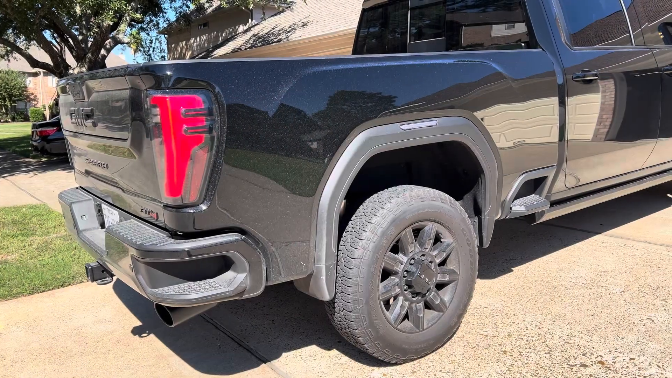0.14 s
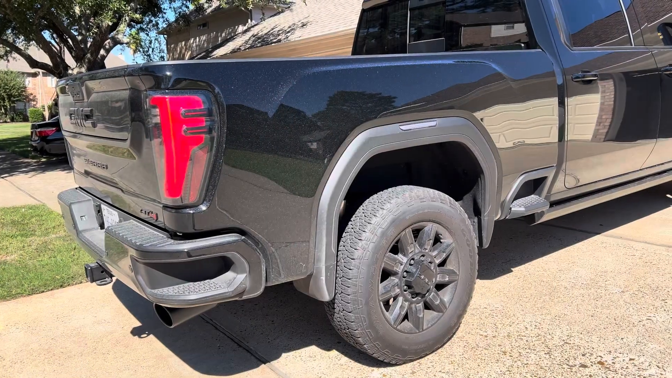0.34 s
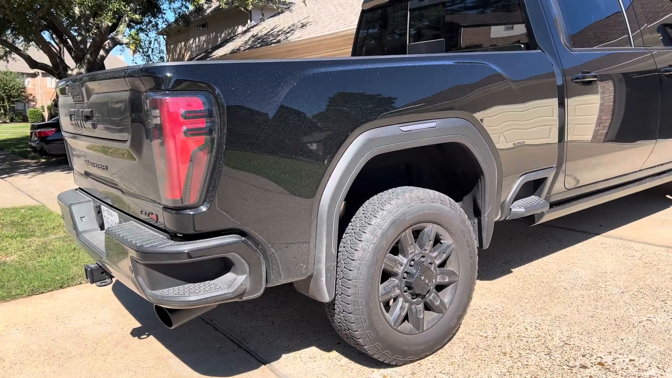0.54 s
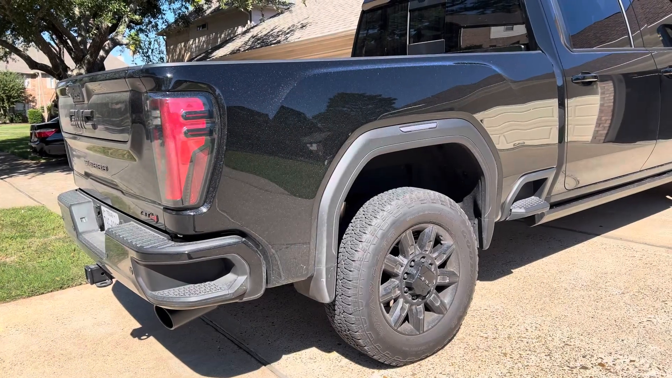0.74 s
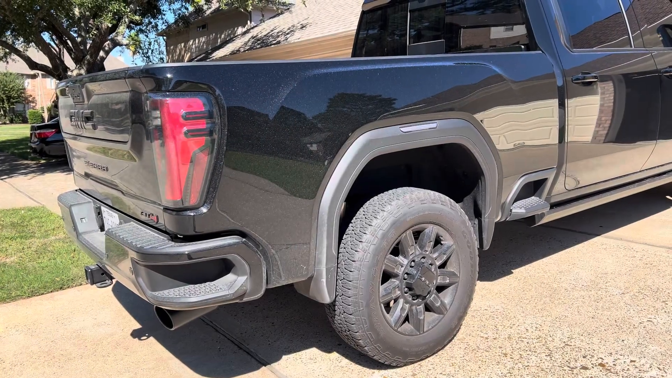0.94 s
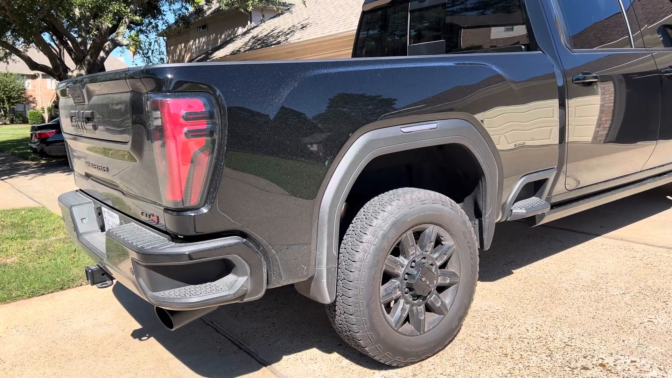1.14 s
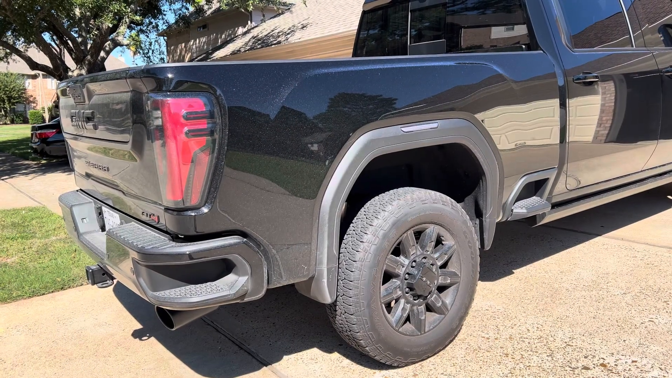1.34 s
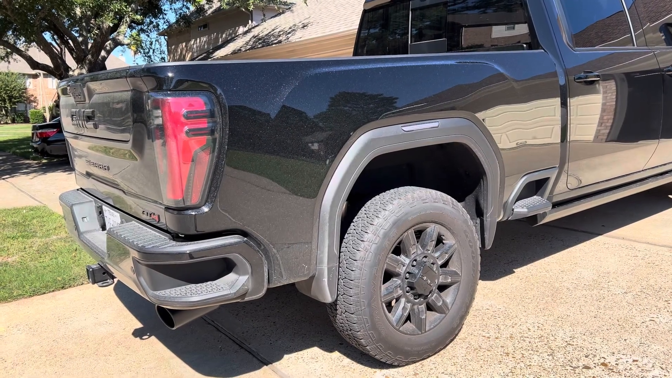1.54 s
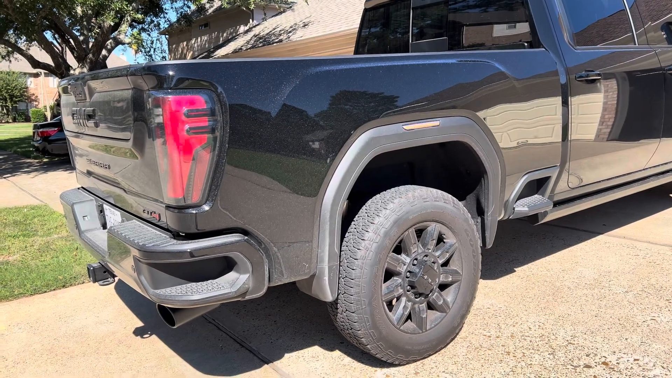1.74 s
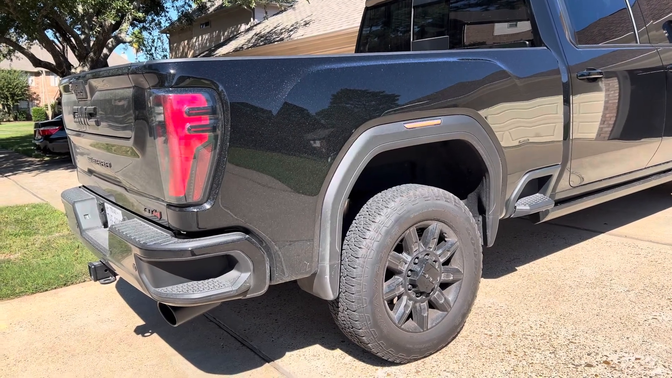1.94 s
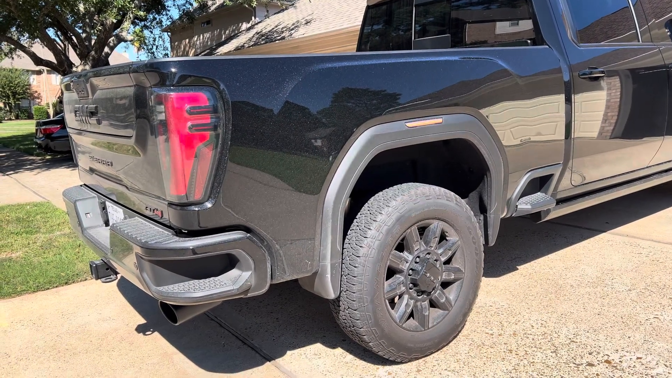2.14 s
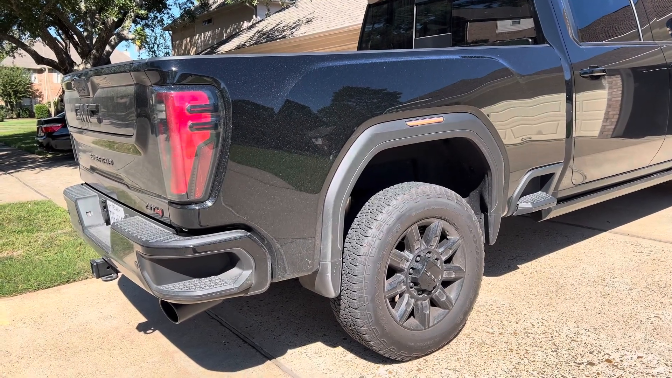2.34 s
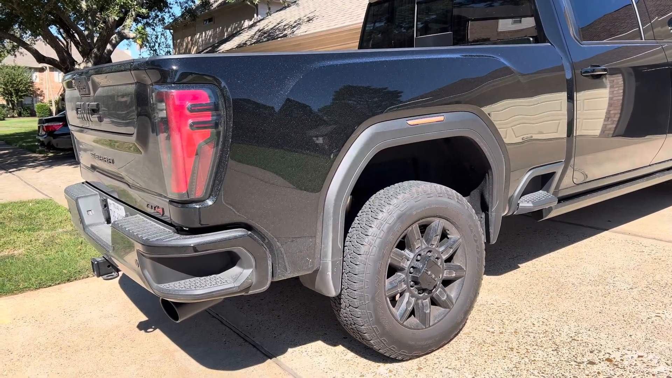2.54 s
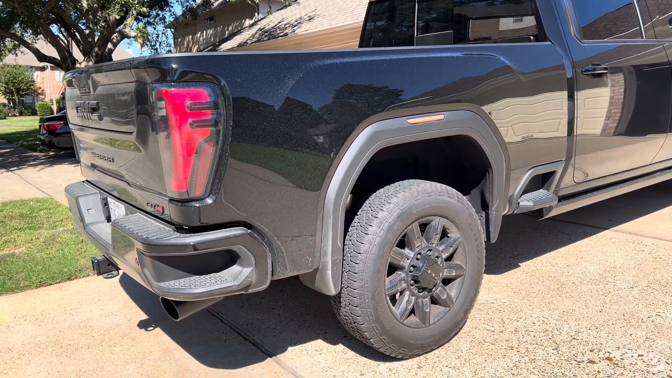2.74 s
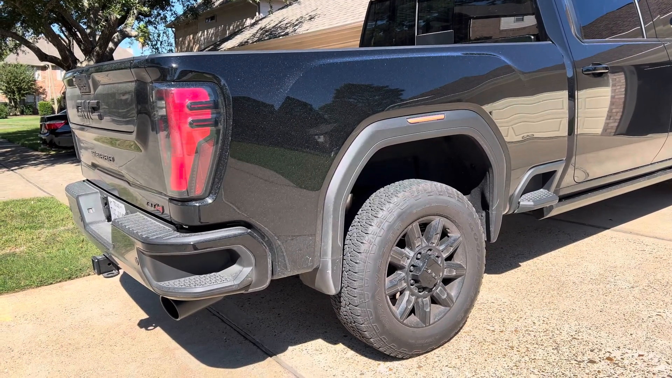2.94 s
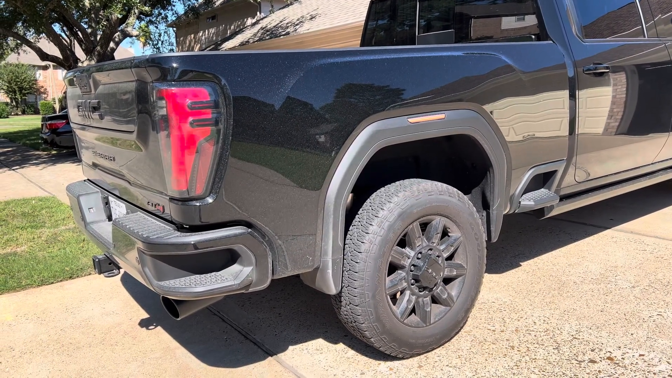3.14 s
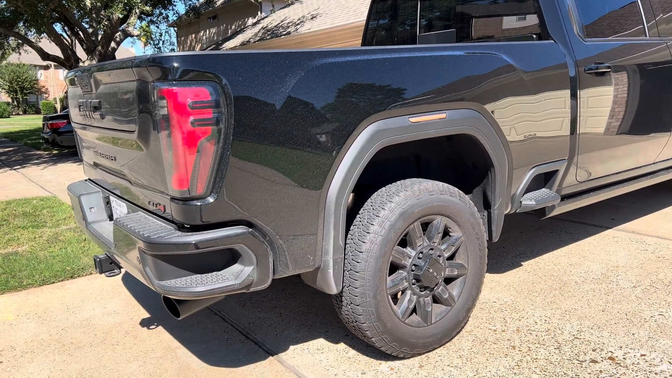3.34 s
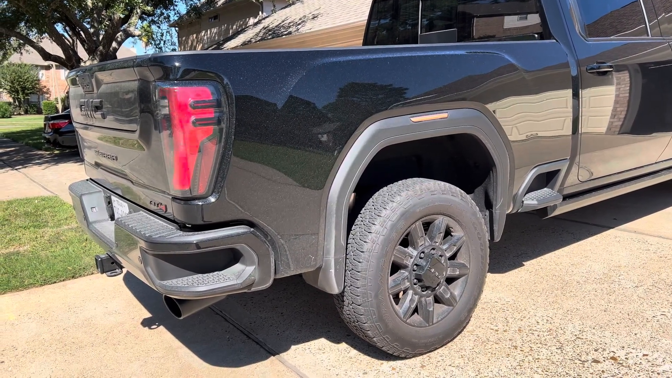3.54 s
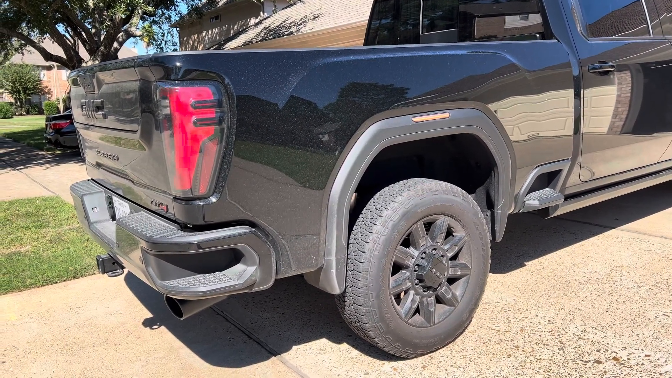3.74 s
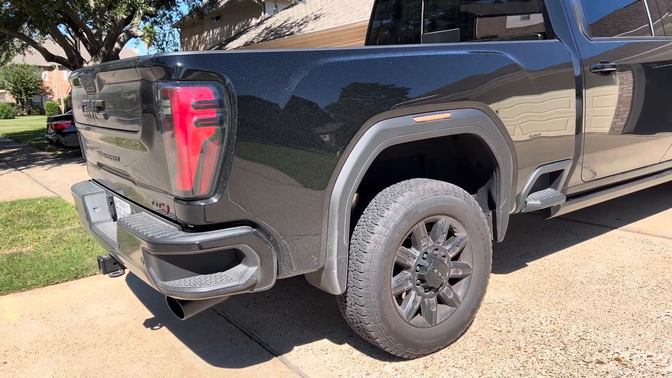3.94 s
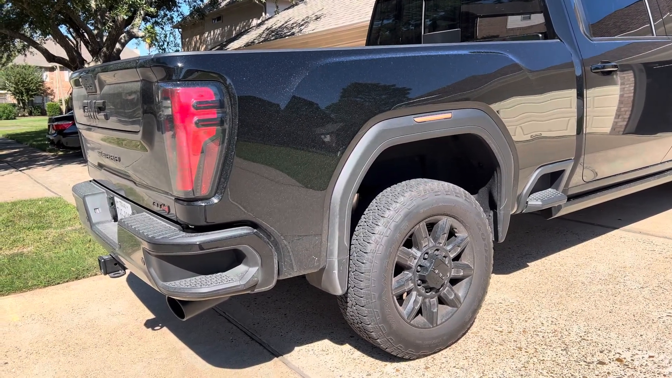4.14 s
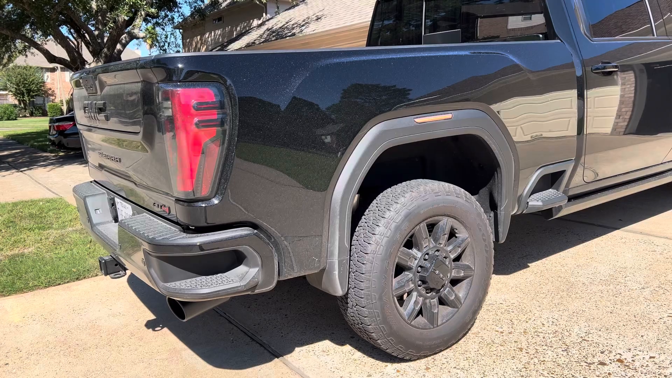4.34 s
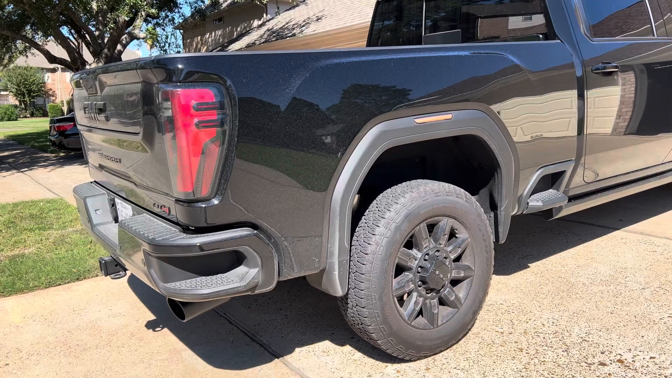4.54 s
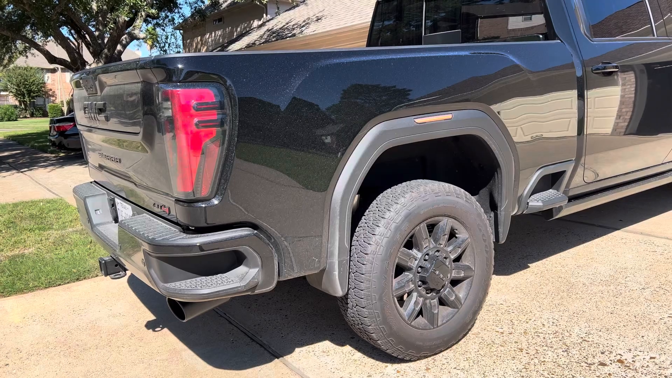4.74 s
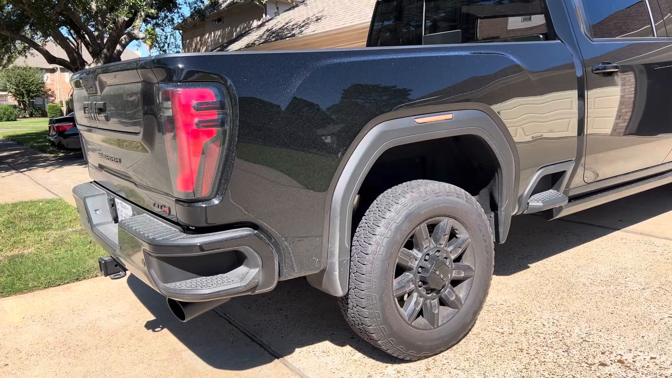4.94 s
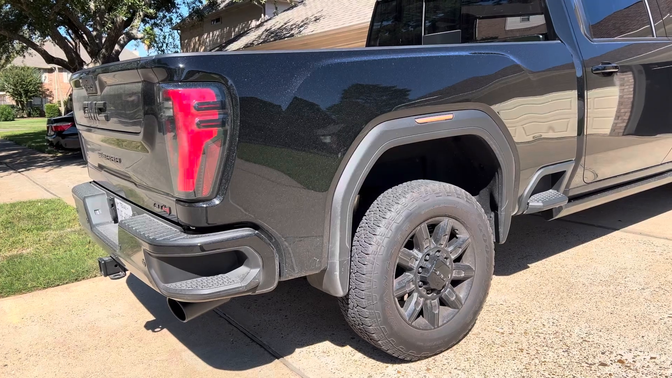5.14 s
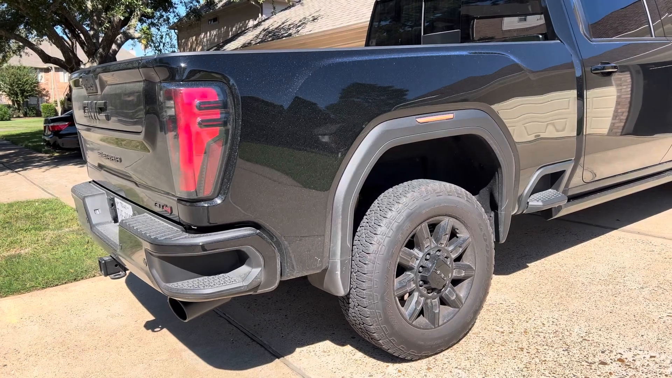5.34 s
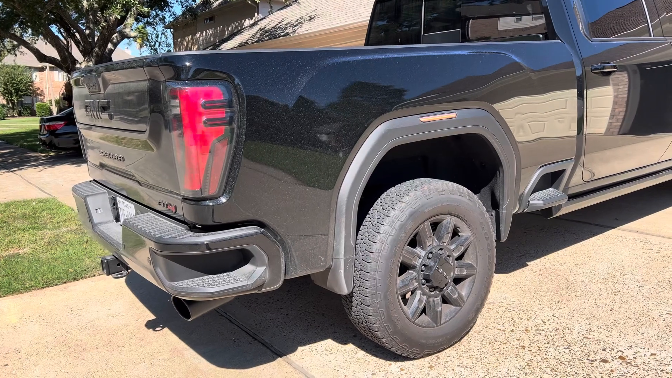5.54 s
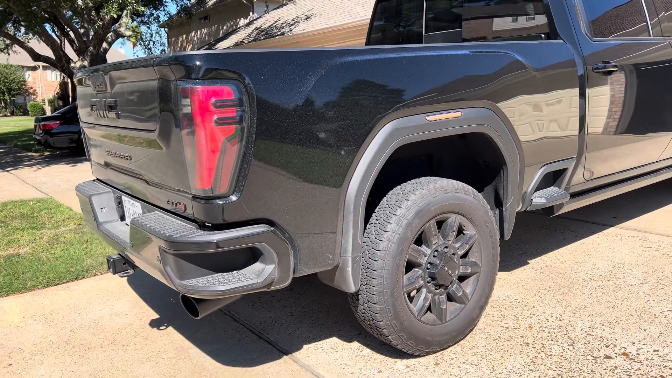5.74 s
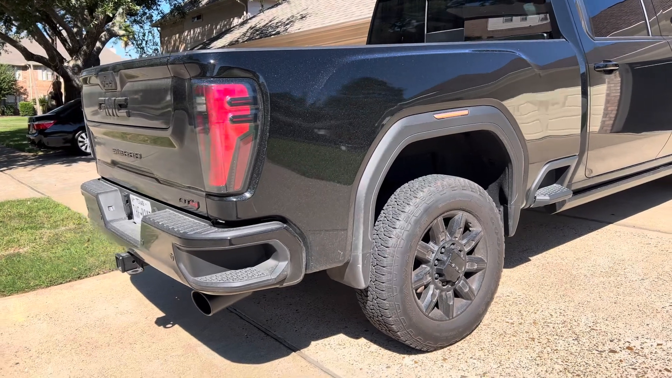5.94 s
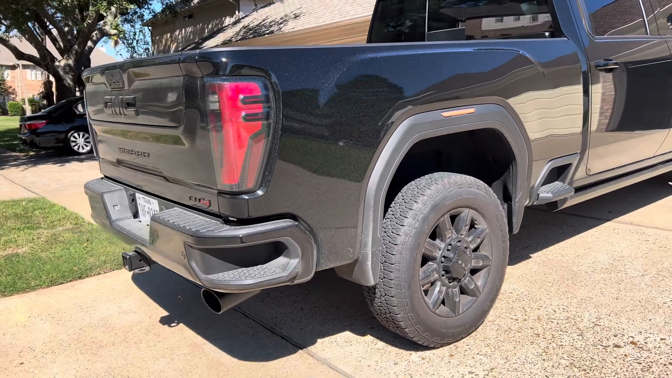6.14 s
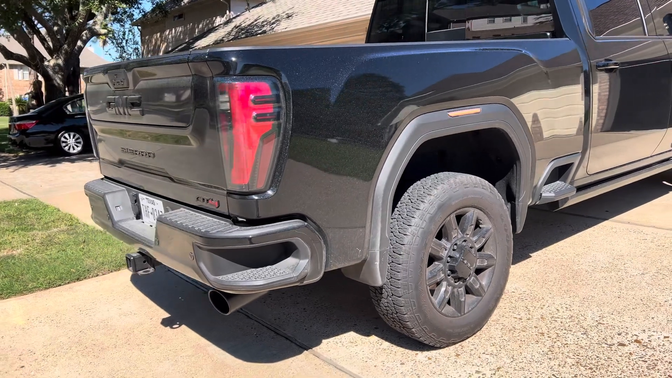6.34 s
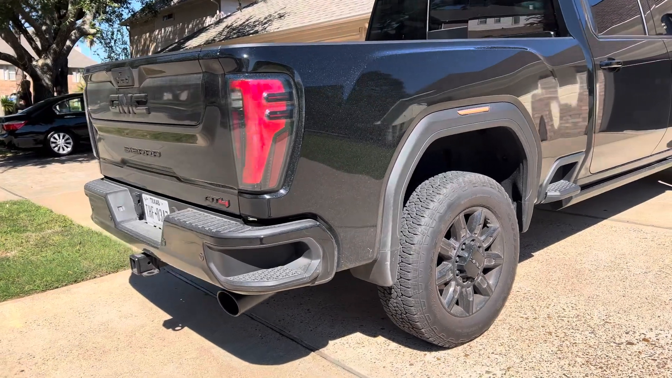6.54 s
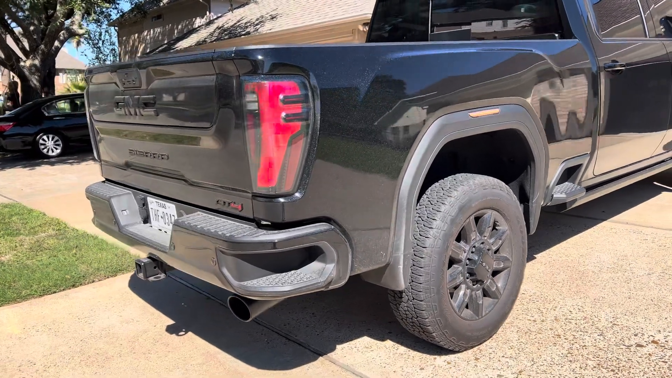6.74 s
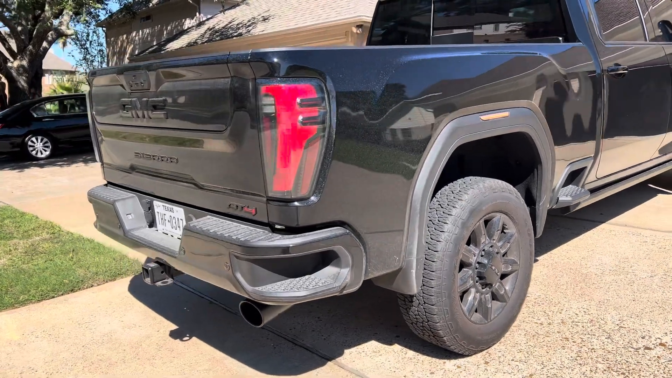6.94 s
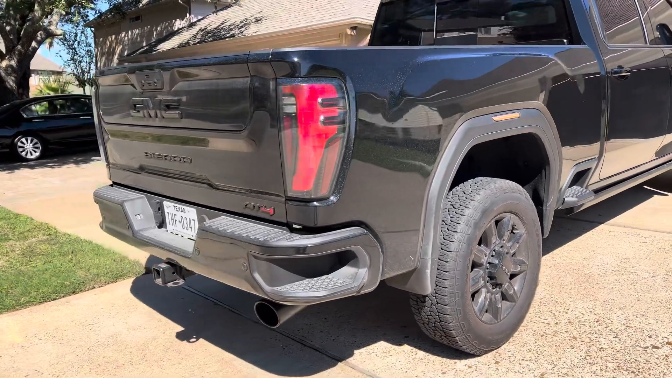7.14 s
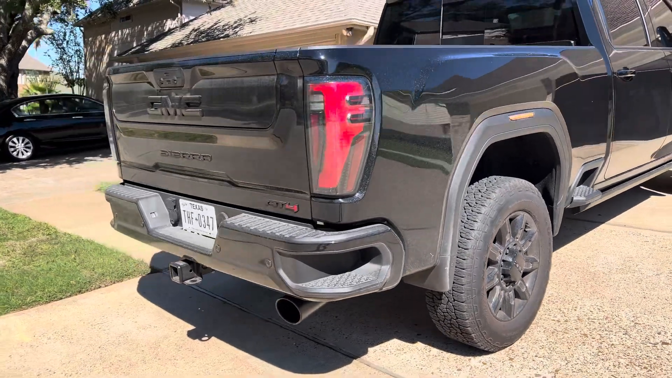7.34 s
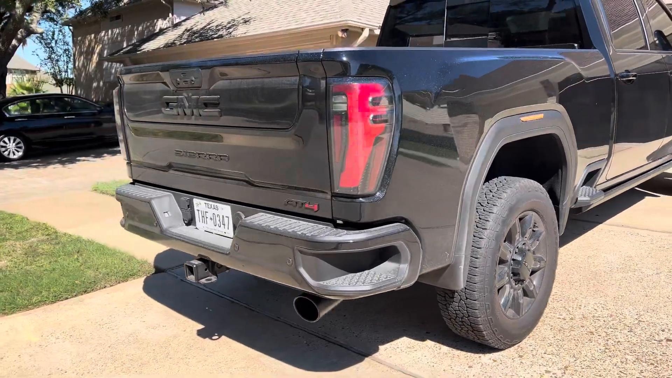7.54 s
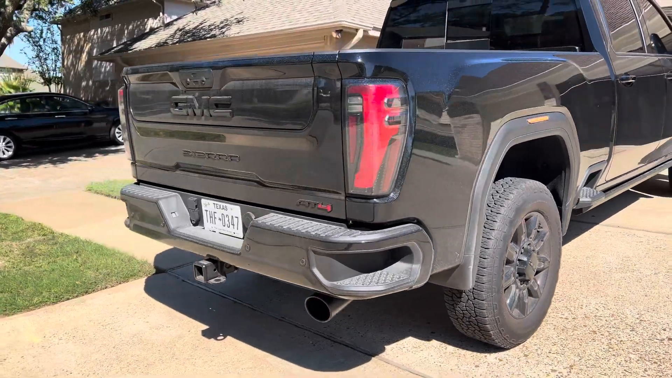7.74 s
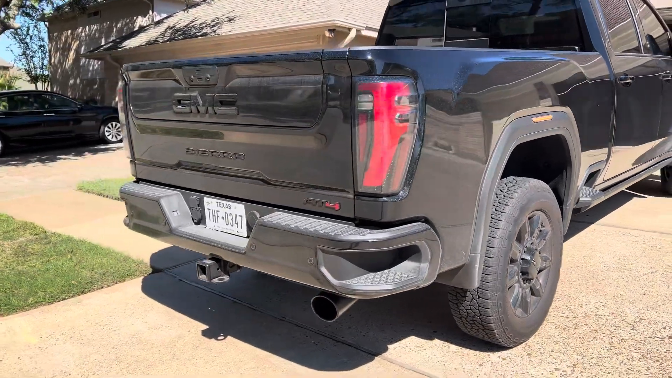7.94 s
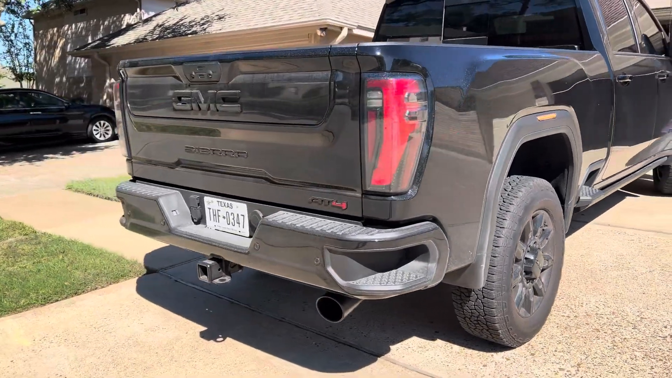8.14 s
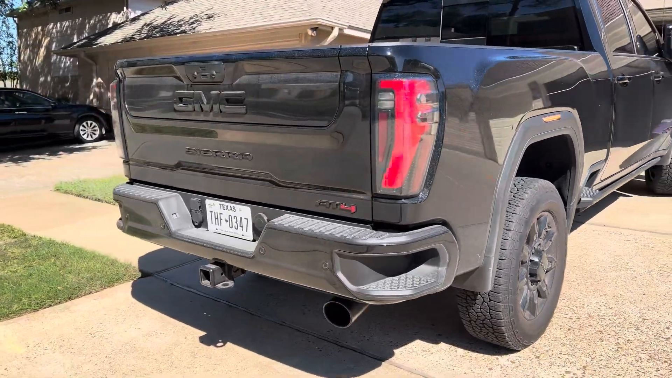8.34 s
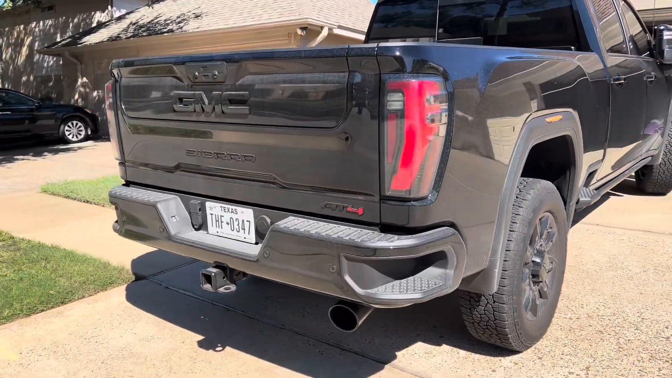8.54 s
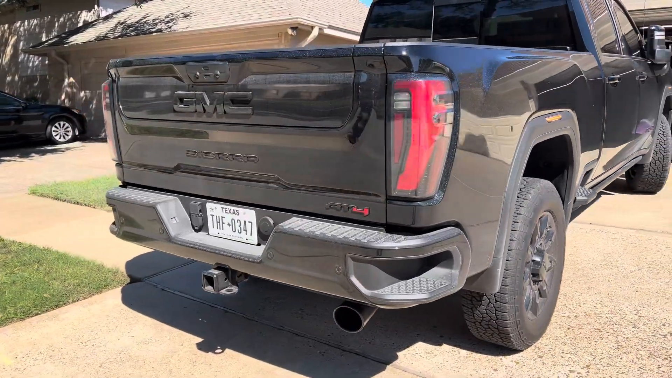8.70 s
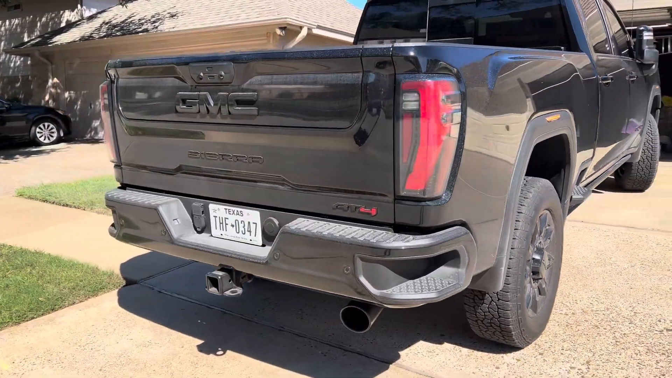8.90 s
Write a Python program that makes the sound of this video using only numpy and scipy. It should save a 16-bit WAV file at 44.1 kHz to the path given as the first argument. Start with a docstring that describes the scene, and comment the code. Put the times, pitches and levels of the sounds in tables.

```python
"""A big petrol V8 pickup is started on a driveway, heard from beside its tailpipe.
First a fuel pump spins up and primes over a low rumble; then the starter clacks in and its gears grind
through a few compressions, with dull puffs from the pipe. The engine catches, stumbles once, cracks and flares,
then sinks to a lumpy idle: a note built from sine waves, with hiss, ticks and a thin whine.
Late on the listener steps round behind the pipe, and the exhaust grows fuller."""
import sys
import numpy as np
from scipy import signal
from scipy.fft import rfft, irfft
from scipy.io import wavfile
from scipy.ndimage import uniform_filter1d

SR = 44100
rng = np.random.default_rng(int(sys.argv[2]) if len(sys.argv) > 2 else 0)


def transcribe(signal):
    """Save signal, clipped to [-1, 1], as a 16-bit WAV file at the path in sys.argv[1]."""
    frames = np.atleast_2d(signal).T
    limited = np.clip(frames, -1, 1)
    pcm = np.round(limited * 32767).astype(np.int16)
    wavfile.write(sys.argv[1], SR, pcm)


N = 395577
TIME, BINS = np.arange(N) / SR, np.fft.rfftfreq(N, 1 / SR)  # seconds, Hz
CATCH_S, FLARE_S = 1.5, 2.0  # the engine catches; the flare reaches its top
IDLE_RATE, FLARE_RATE = 82, 95  # firings per second


# How strong each multiple of the eight-firing cycle is, from the fourth up.
# Each row: relative level in dB in the flare, while sinking, at idle beside the pipe, and behind it.
NOTE_OVERTONES = [(-24, -38, -34.5, -33.5), (-14.0, -7, -7, -7.5), (-29.5, -37, -30, -31.5),
                  (-24, -14.5, -13, -17), (1, 0.0, 0.0, 0.5), (-24.5, -12.5, -12.5, -16.5),
                  (-28, -26, -29.5, -29), (-15.5, -10, -9, -11.5), (-16.5, -21, -19.5, -28),
                  (-13.5, -15.5, -23.5, -23.5), (-25.5, -21.5, -14.5, -21), (-14.5, -19, -36, -22),
                  (-8, -3.5, -5, -9), (-27, -16.5, -20.5, -16), (-16.5, -12.0, -9, -16),
                  (-28, -25, -16, -16.5), (-35, -20, -12.5, -20), (-16, -14, -11, -10.5),
                  (-27.5, -34, -42.5, -38), (-35.0, -24.5, -25.5, -33.5), (-41, -24.5, -22.5, -22.5),
                  (-38, -36.5, -39.5, -44), (-35.0, -27, -34.5, -30.5), (-36, -28, -28.5, -34),
                  (-22, -23, -31, -33.5), (-22, -40.5, -29.5, -26), (-43.5, -33, -29, -24.0),
                  (-40, -24.5, -22, -34), (-43.5, -35.5, -26, -27.5), (-30.5, -40, -32.5, -36),
                  (-29, -38, -32, -38.5), (-37.5, -45.0, -37.5, -49), (-31.5, -40.5, -44, -40.5),
                  (-40, -26, -36.5, -35), (-44, -32.5, -29.5, -35.5), (-49, -45, -33.5, -40.5),
                  (-47, -38, -29.5, -23.5), (-47, -52.5, -39, -28), (-42, -57, -48.5, -37),
                  (-38.5, -54.5, -47.5, -49), (-36.5, -53, -50.5, -37.5), (-46, -39, -48, -48.5),
                  (-43, -35, -44, -40.5)]
# Which of those four columns is heard. Each row: time in seconds, column number (fractions blend).
NOTE_STAGE = [(2.05, 0), (2.35, 1), (3.2, 1), (4.3, 2), (5.9, 2), (7.7, 3)]
# The cylinder bank of each firing in the cycle. Each entry: 0 or 1.
BANK_OF_FIRING = np.array([1, 0, 0, 1, 0, 1, 1, 0])
# How hard each cylinder blows, in firing order; this shapes only the phases of the note.
# Each entry: relative strength in dB.
CYLINDER_BLOWS = [3.3, -4.2, 4.9, -4.8, .5, -1.9, 2.9, -2.9]
# Barks that replace the blows in the upper part of the note, again only in its phases.
# Each row: place in the cycle in firings, relative strength in dB.
UPPER_BARKS = [(.8, -2), (1.8, 1), (2.3, 3), (3.8, -10), (4.3, -3), (5.3, -8), (6.8, -2), (7.3, 4)]
# Standing waves of pipe and muffler, which turn the phases of the note.
# Each row: frequency in Hz, width in Hz.
PIPE_WAVES = [(52.5, 8.4), (71, 37), (182, 10), (215, 69), (302, 33)]
# Loudness of the note: dB at idle, dB added at full effort, dB added by the whole walk.
NOTE_LOUDNESS = (-16, 8.6, 5.66)
BARK_FROM = 22  # first multiple of the cycle that uses the barks
VALVE_AT, BANK_DELAY = -.21, .5  # first blow, and extra delay of the longer bank (firings)
PORT_LAG = 7  # the exhaust reaches the left side this much later (samples)


def exhaust(firings, uneven=0.05, jitter=0.005, stumble=1.5):
    """Eight blows a cycle; one bank's pipe is longer, so the uneven bank order makes the note lope."""
    unrest = 1 + stumble * np.interp(TIME, [1.6, 1.76], [1, 0])  # the first firings are ragged
    cycle = (firings + jitter * unrest * drift(45)) / 8
    arrivals = VALVE_AT + np.arange(8) + BANK_DELAY * BANK_OF_FIRING
    speed, speeds = curves(FIRING_RATE)[0], np.arange(60, 100)
    stage, out = curves(NOTE_STAGE)[0], np.zeros(N)
    for k, row_db in enumerate(NOTE_OVERTONES, 4):
        hz = k * speeds / 8
        pipe = np.prod([1 / (f * f - hz * hz + 1j * hz * width) for f, width in PIPE_WAVES], axis=0)
        at, blow_db = (arrivals, CYLINDER_BLOWS) if k < BARK_FROM else np.transpose(UPPER_BARKS)
        blows = amp(blow_db) @ np.exp(-2j * np.pi * k * at / 8)
        phase = np.interp(speed, speeds, np.unwrap(np.angle(blows * pipe)))
        size = np.interp(stage, np.arange(len(row_db)), amp(row_db))
        out += size * np.cos(2 * np.pi * k * cycle + phase)
    # even out the loudness, so that the level law below sets it
    running = TIME > CATCH_S
    power = uniform_filter1d(out ** 2 * running, size=17000).clip(1e-9)
    share = uniform_filter1d(1. * running, size=17000).clip(1e-9)
    out /= np.sqrt(power / share)
    out *= level(NOTE_LOUDNESS, bend=0.84) * (1 + uneven * unrest * drift(25))
    left = np.concatenate([np.zeros(shape=PORT_LAG), out])[:N]  # the left is farther from the pipe
    return np.array([left, out]) * amp([[-.45], [.45]])


# Tone colour of the chuffs beside the pipe. Each row: frequency in Hz, relative level in dB per Hz.
CHUFF_BESIDE_COLOUR = [(380, -27.5), (490, 8), (590, -3.5), (640, -5), (690, -2), (820, 0.5), (930, -27),
                       (2000, -45.5)]
# The same behind the pipe. Each row: frequency in Hz, relative level in dB per Hz.
CHUFF_BEHIND_COLOUR = [(380, -18.5), (495, 17), (580, 0), (650, -6), (740, -1.5), (830, -11), (930, -22),
                       (2000, -39)]
# Loudness of the chuffs: dB at idle, dB added at full effort, dB added by the whole walk.
CHUFF_LOUDNESS = (-61, 16, 16)


def chuffs(strength, age):
    """The steep front of each blow has a fixed shape, so it makes clean overtones above the note."""
    front = strength * age * np.exp(-(age / .015) ** 2)
    drive = np.array([front, 0 * front])
    beside, rear = (ports(drive, amp(read(colour)), (450, 950))
                    for colour in (CHUFF_BESIDE_COLOUR, CHUFF_BEHIND_COLOUR))
    late = behind()
    return level(CHUFF_LOUDNESS, bend=2.0) * ((1 - late) * beside + late * rear)


# Tone colour of the rushing gas. Each row: frequency in Hz, relative level in dB per Hz.
PUFF_COLOUR = [(30, -10.5), (70, 5.5), (200, 8), (330, 3), (430, -3.5), (520, -9.5), (650, -14.5),
               (820, -8), (950, -34), (1400, -27.5), (3000, -49)]
# Loudness of the gas: dB at idle, dB added at full effort, dB added by the whole walk.
PUFF_LOUDNESS = (-57, 19.8, 4)
# the tailpipe's evenly spaced overtones colour the gas
OVERTONE_HZ, OVERTONE_STEP_HZ = 495, 94


def puffs(strength, age, between=1.0, overtone_db=3.5):
    """A short tear of rushing gas, made of noise, comes with each blow."""
    tear = between * (1 - .5 * effort()) + strength * np.exp(-(age / .27) ** 2)
    overtones = overtone_db * np.cos(2 * np.pi * (BINS - OVERTONE_HZ) / OVERTONE_STEP_HZ)
    gas = ports(tear * rng.standard_normal((2, N)), amp(read(PUFF_COLOUR) + overtones), (550, 950))
    return level(PUFF_LOUDNESS, bend=1.29) * gas


# Strength of each cylinder's chuff and puff, in firing order. Each entry: relative strength in dB.
CHUFF_STRENGTHS = [1, -4, 0, 4.5, -1.5, 1, -4.5, 0]


def blow_timing(firings, early=.15, chance_db=1.5, bank_lag=0.059):
    """Strength of each blow and firings since its front; under load, blows are earlier and more even."""
    load, blow = effort(), firings.astype(int)
    cylinder = blow % len(BANK_OF_FIRING)
    chance = chance_db * (1.5 - load) * rng.standard_normal(blow.max() + 1)[blow]
    strength = amp(np.array(CHUFF_STRENGTHS)[cylinder] + chance)
    return strength, firings % 1 - .47 - bank_lag * BANK_OF_FIRING[cylinder] + early * load


# Hard firings that crack out of the pipe, loudest during the flare.
# Each row: start in seconds, level in dB.
CRACK_TIMES = [(1.577, -41), (1.638, -29), (1.674, -28), (1.703, -23), (1.725, -31), (1.759, -25),
               (1.791, -25), (1.812, -28), (1.849, -26), (1.899, -35), (1.932, -33), (1.985, -31),
               (2.015, -25), (2.076, -31), (2.106, -36), (7.982, -42), (8.475, -39), (8.575, -38.5),
               (8.872, -36)]


def cracks(low_hz=560, high_hz=880, snap=0.11):
    """A hard firing leaves the pipe as one steep front that rings briefly in the tip."""
    fronts = np.zeros(N)
    for s, db in CRACK_TIMES:
        fronts[round(s * SR)] = amp(db)
    click = signal.unit_impulse(shape=1024)
    ring = signal.lfilter(*signal.butter(3, [low_hz, high_hz], "band", fs=SR), click)
    edge = signal.lfilter(*signal.butter(2, [low_hz, 2500], "band", fs=SR), click)
    shape = ring / abs(ring).max() + snap * edge / abs(edge).max()
    return signal.oaconvolve(fronts, shape)[:N]


# Tone colour of the engine bay from beside. Each row: frequency in Hz, relative level in dB per Hz.
BAY_BESIDE_COLOUR = [(400, -10), (950, -3.5), (1450, -3), (1680, -3.5), (1900, -5.5), (2350, -4),
                     (2650, 1.5), (4100, -6), (5150, -5.5), (5500, -5.5), (7500, -14), (11000, -15),
                     (13400, -19), (15800, -18)]
# The same from behind. Each row: frequency in Hz, relative level in dB per Hz.
BAY_BEHIND_COLOUR = [(400, -7), (950, 1.5), (1600, -3), (2400, 1), (2700, 3.5), (3500, -1.5), (4100, -3),
                     (4800, 0), (5100, 0.5), (5450, -4), (7600, -12.5), (8500, -11), (11000, -12),
                     (15800, -24)]
# Resonances of engine bay and underbody heard beside the truck.
# Each row: frequency in Hz, half-width in Hz, relative level in dB.
BAY_BESIDE_MODES = [(1134, 9.1, -2.5), (1290, 6.6, -8), (1380, 17, -3.5), (1500, 23, 3), (1830, 35, -7.5),
                    (2047, 45, -3), (2390, 5.8, 2), (3250, 9.3, -11), (3430, 6.3, -1), (3800, 46, -10),
                    (4800, 47, -3)]
# Those heard behind it. Each row: frequency in Hz, half-width in Hz, relative level in dB.
BAY_BEHIND_MODES = [(1075, 33, -2), (1410, 20, -7), (1580, 53, -3.5), (1630, 31, 0.5), (1760, 25, -1),
                    (2210, 25, -6)]
# Loudness of the bay: dB at idle, dB added at full effort, dB added by the whole walk.
BAY_LOUDNESS = (-55, 8.35, -2.8)


def engine_bay(firings, tick=0.34, flutter_db=0.8, ring_db=5.0):
    """Fan and belt hiss is noise and tiny impacts; injector ticks lift it briefly at each firing."""
    ticks = 1 + tick * np.exp(-(firings % 1) / 0.063)
    hiss = rng.standard_normal((2, N)) + .5 * grains(1500, 1.7)
    drive = ticks * amp(flutter_db * drift(33)) * hiss
    late = behind()
    places = ((BAY_BESIDE_COLOUR, BAY_BESIDE_MODES), (BAY_BEHIND_COLOUR, BAY_BEHIND_MODES))
    beside, rear = (ports(drive, amp(read(colour)) * (1 + amp(ring_db) * peaks(modes)), (2400, 7000))
                    for colour, modes in places)
    spin_up = np.interp(TIME, [1.56, 1.69], [0, 1])
    return spin_up * level(BAY_LOUDNESS, bend=1.45) * ((1 - late) * beside + late * rear)


# Loudness of a thin whine, probably the alternator. Each row: time in seconds, level in dB.
WHINE_LOUDNESS = [(2.7, -80), (3.2, -61), (3.7, -67), (4.0, -68), (4.25, -60), (4.9, -61), (5.15, -68),
                  (5.55, -62), (6.3, -66), (6.75, -58), (7.3, -59), (7.7, -66), (8.3, -62), (8.97, -66)]
WHINE_PER_FIRING = 62.25  # whine cycles per firing


def belt_whine(waver_hz=13, flutter_db=3.5):
    """A thin whine that follows the engine speed, wavering and breaking up."""
    waver = waver_hz * (drift(9) + 2 * drift(150))
    turns = np.cumsum(WHINE_PER_FIRING * curves(FIRING_RATE)[0] + waver) / SR
    flutter = amp(flutter_db * drift(12).clip(-3, 1.3))
    whine = evened(flutter * np.sin(2 * np.pi * turns))
    return amp(curves(WHINE_LOUDNESS)[0]) * (TIME > FLARE_S) * whine


# Engine speed: the flare, then the sinking idle. Each row: time in seconds, firings per second.
FIRING_RATE = [(1.5, 64.61), (1.68, 91.51), (1.85, 93.54), (2.0, 95.06), (2.25, 89.33), (2.55, 88.15),
               (2.8, 86.94), (3.25, 85.98), (3.68, 83.52), (3.85, 84.05), (4.3, 84.01), (4.42, 83.45),
               (4.58, 83.4), (5.15, 82.11), (5.6, 82.73), (6.5, 82.22), (6.88, 81.28), (7.05, 82.26),
               (7.35, 82.49), (7.6, 82.08), (8.1, 81.36), (8.97, 80.36)]


def crank():
    """Firings counted since the engine caught."""
    return np.cumsum(curves(FIRING_RATE)[0] * (TIME >= CATCH_S)) / SR


def effort():
    """How hard the engine works: 1 until the top of the flare, then falling with the speed to 0 at idle."""
    sinking = (curves(FIRING_RATE)[0] - IDLE_RATE) / (FLARE_RATE - IDLE_RATE)
    return np.where(TIME < FLARE_S, 1, np.clip(sinking, 0, 1))


WALK_S = (5.47, 10.8)  # loudness changes along the walk, which outlasts the scene


def level(law, bend):
    """Gain of a layer of the running engine, from the effort and the listener's walk."""
    idle_db, effort_db, walk_db = law
    return amp(idle_db + effort_db * effort() ** bend + walk_db * np.interp(TIME, WALK_S, [0, 1]))


def behind():
    """Blend of tone: 0 beside the truck, 1 behind the tailpipe."""
    return np.interp(TIME, [5.9, 7.7], [0, 1])


# Tone colour of the gears. Each row: frequency in Hz, relative level in dB per Hz.
GEAR_COLOUR = [(25, -19), (45, -2), (90, -1.5), (160, -5), (260, -2.5), (340, -2.5), (600, -10), (1000, -7),
               (1700, -7), (2330, -4.5), (2700, -1), (4800, -7.5), (7500, -11.5), (8300, -12),
               (9700, -27.5), (11000, -11), (13000, -24.5), (15800, -18)]
# Ringing of the starter and bell housing.
# Each row: frequency in Hz, half-width in Hz, relative level in dB.
HOUSING_MODES = [(269, 30, -17.5), (637, 18, 1), (791, 16, 9.5), (1150, 24, 3.5), (1364, 20, 4.5),
                 (1453, 27, 10.5), (1990, 42, 3), (3800, 81, -31), (4400, 22, -3), (4720, 22, 5),
                 (4880, 70, -9)]
# Groans and squeals of the gear teeth under load.
# Each row: start in seconds, length in seconds, first Hz, last Hz, relative level in dB.
GEAR_SQUEALS = [(0.662, 0.037, 389, 363, -36.5), (0.663, 0.051, 1496, 1400, -35),
                (0.716, 0.027, 2050, 1960, -29.5), (0.733, 0.022, 4470, 4170, -43),
                (0.79, 0.13, 1190, 1258, -36.5), (0.846, 0.094, 247, 278, -51),
                (0.886, 0.028, 2020, 1910, -29.5), (0.89, 0.079, 490, 460, -41),
                (0.907, 0.049, 1980, 2050, -34.5), (0.908, 0.025, 4850, 4770, -36),
                (0.956, 0.04, 3950, 4300, -38), (0.993, 0.12, 347, 305, -45),
                (1.014, 0.025, 4200, 4120, -36), (1.03, 0.054, 1290, 1214, -35),
                (1.045, 0.055, 3920, 4240, -35), (1.124, 0.05, 762, 800, -38.5),
                (1.14, 0.097, 1410, 1494, -41), (1.177, 0.06, 4400, 5240, -41),
                (1.224, 0.03, 1358, 1410, -40), (1.314, 0.065, 1367, 1338, -37),
                (1.332, 0.082, 440, 430, -38.5), (1.413, 0.039, 2060, 1950, -32.5)]
# The motor gathers speed: first and top pitch of the gear mesh before any load slows it.
STARTER_ON_S, SPIN_UP_S, MESH_FIRST_HZ, MESH_TOP_HZ = 0.59, .22, 950, 1826


def starter(ring_db=8.0, body_db=6.0, squeal_db=-3.0, whine_db=-11.5, sag=0.2, slip_db=-5.5):
    """Gear teeth clatter and whine in the housing, hardest as each piston comes up on compression."""
    housing = amp(read(GEAR_COLOUR)) * (amp(body_db) + amp(ring_db) * peaks(HOUSING_MODES))
    body, bright = gear_load()
    age = np.maximum(TIME - STARTER_ON_S, 0)
    free_hz = MESH_TOP_HZ + (MESH_FIRST_HZ - MESH_TOP_HZ) * np.exp(-age / SPIN_UP_S)
    # the motor slows under each load and races between them
    slowing = uniform_filter1d(body / body.max(), size=1500)
    mesh_hz = free_hz * (1 - sag * slowing) * (1 + 0.074 * drift(260))
    mesh = 2 * np.pi * np.cumsum(mesh_hz) / SR
    teeth = sum(size * drift(70) * np.sin(k * mesh) for k, size in enumerate([.4, .4, 1, .4], 1))
    clatter = ports(grains(6000, 2.8), housing, (50, 16000))
    gears = clatter + amp(whine_db) * teeth + amp(slip_db) * rings()
    # split near 2800 Hz, as the load drives the treble separately
    treble = irfft(rfft(gears) / (1 + (2800 / (BINS + 1)) ** 4), N)
    sound = body * (gears - treble) + bright * treble
    waver = 25 * drift(175)
    for s, length, first_hz, last_hz, db in GEAR_SQUEALS:
        u = np.clip((TIME - s) / length, 0, 1)
        turns = np.cumsum(first_hz + (last_hz - first_hz) * u + waver) / SR
        side_phase = np.array([[0], [-1.2]]) * (first_hz > 1000)
        squeal = np.sin(np.pi * u) * np.sin(2 * np.pi * turns + side_phase)
        sound = sound + amp(db + squeal_db) * 2 * squeal
    return sound


# The pinion touches, then clacks into the ring gear. Each row: start in seconds, level in dB.
PINION_CLACKS = [(0.641, -41.5), (0.655, -22.5), (0.674, -21.5)]
# Compressions that load the starter.
# Each row: start in seconds, length in seconds, level in dB before it eases.
COMPRESSION_LOADS = [(0.684, 0.34, -32.5), (0.802, 0.23, -34.5), (0.992, 0.125, -30), (1.119, 0.11, -29.5),
                     (1.23, 0.084, -28.5), (1.315, 0.088, -28), (1.407, 0.12, -29)]
CLACK_RISE_S, CLACK_DECAY_S = 0.005, 0.015
# each load bites at once and eases as the piston goes over the top
LOAD_RISE_S, LOAD_EASE_DB, LOAD_TREBLE_DB = 0.0097, -13, -3.5
# the engine runs away from the pinion, which rattles on freely
OVERRUN_S, OVERRUN_END_S, OVERRUN_FADE_S = 1.49, 1.647, 0.02
OVERRUN_DB, OVERRUN_TREBLE_DB = -38, 3


def gear_load(clack_treble_db=0.0):
    """Force on the gears, as gains of body and of treble: clacks, compressions, then the overrun."""
    clacks = strokes = np.zeros(N)
    for s, db in PINION_CLACKS:
        age = np.maximum(TIME - s, 0)
        clack = amp(db) * np.minimum(age / CLACK_RISE_S, 1) * np.exp(-age / CLACK_DECAY_S)
        clacks = np.hypot(clacks, clack)
    for s, length, db in COMPRESSION_LOADS:
        age = np.maximum(TIME - s, 0)
        easing = amp(db + LOAD_EASE_DB * (age / length) ** 2.3)
        strokes = np.hypot(strokes, np.minimum(age / LOAD_RISE_S, 1) * easing)
    fade_in = np.clip((TIME - OVERRUN_S) / OVERRUN_FADE_S, 0, 1)
    fade_out = np.exp(-np.maximum(TIME - OVERRUN_END_S, 0) / OVERRUN_FADE_S)
    parts = np.array([clacks, strokes, amp(OVERRUN_DB) * fade_in * fade_out])
    treble = amp([[clack_treble_db], [LOAD_TREBLE_DB], [OVERRUN_TREBLE_DB]])
    return np.linalg.norm(parts, axis=0), np.linalg.norm(parts * treble, axis=0)


# Brief rings of the ring gear and its cover. Each row: frequency in Hz, relative level in dB.
GEAR_RINGS = [(280, 4), (440, 1.5), (790, -4), (1280, 2.5), (3500, 2.5), (4150, 8), (4750, 6), (5300, 3.5),
              (6000, 5), (8300, -2)]
RINGS_PER_S, RING_S = 450, .014  # how many, and their middling length


def rings(scatter=0.0588, glide=0.034, spread_db=0.5):
    """Teeth catch and slip: each slip is a chirp near one of the rings, with its own length and bend."""
    start = PINION_CLACKS[0][0]
    out, span = np.zeros(N), OVERRUN_END_S + .1 - start
    for when, which, *draws in rng.random((round(RINGS_PER_S * span), 6)):
        pitch, bend, size, long = 3.5 * (np.array(draws) - .5)
        hz, db = GEAR_RINGS[int(which * len(GEAR_RINGS))]
        u = np.linspace(0, 1, round(RING_S * 2 ** (long / 2) * SR))
        turns = np.cumsum(hz * (1 + scatter * pitch + glide * bend * (u - .5))) / SR
        at = round((start + when * span) * SR)
        chirp = np.sin(np.pi * np.sqrt(u)) * np.sin(2 * np.pi * turns)
        out[at:at + len(u)] += amp(db + spread_db * size) * chirp
    return evened(out) * np.sqrt(span * SR / N)  # rms 1 within the span


# Dull puffs from the pipe before the engine fires. Each row: middle in seconds, level in dB.
CRANKING_THUDS = [(.71, -44), (.87, -33), (1.025, -36), (1.15, -51), (1.488, -39)]


def thuds(hz=66, length_s=0.026):
    """During cranking, unburnt charge is pushed softly out of the pipe: short swells of a low tone."""
    return sum(amp(db) * np.exp(-((TIME - s) / length_s) ** 2) * np.sin(2 * np.pi * hz * (TIME - s))
               for s, db in CRANKING_THUDS)


# Tone colour of the pump's rush. Each row: frequency in Hz, relative level in dB per Hz.
PUMP_COLOUR = [(500, -17), (1100, 6.5), (1450, 5), (1800, 7), (2400, 6), (3500, 3.5), (6000, -4),
               (9000, -8), (14000, -4)]
# the pump overshoots, then holds its speed
PUMP_ON_S, PUMP_RISE_S, PUMP_OVERSHOOT, PUMP_SETTLE_S = 0.098, 0.038, .1, .035
PUMP_LOW_LINE_HZ, PUMP_WHINE_DB = 5790, -69.5  # the main whine is an octave above the low line
PUMP_HUM_HZ, PUMP_HUM_DB, PUMP_PRIMING_DB = 1824, -66, -9  # the last is added until the engine catches


def fuel_pump(rush_db=-67.5, low_line_db=-12.0):
    """A faint rush and high whine while the pump primes, and a hum that is lost behind the truck."""
    age = np.maximum(TIME - PUMP_ON_S, 0)
    speed = 1 + PUMP_OVERSHOOT * np.exp(-age / PUMP_SETTLE_S)
    on = np.minimum(age / PUMP_RISE_S, 1)
    angle = 2 * np.pi * np.cumsum(PUMP_LOW_LINE_HZ * speed + 6 * drift(60)) / SR
    whine = amp(PUMP_WHINE_DB) * evened(np.sin(2 * angle) + amp(low_line_db) * np.sin(angle))
    hum_angle = 2 * np.pi * np.cumsum(PUMP_HUM_HZ * speed + 12 * drift(50)) / SR
    hum = evened((1 + 0.56 * drift(16)) * np.sin(hum_angle))
    hum_gain = amp(PUMP_HUM_DB + PUMP_PRIMING_DB * (TIME < CATCH_S)) * (1 - behind())
    priming = np.interp(TIME, [.14, .25, .66, .8], [0, 1, 1, 0])
    rush = amp(rush_db) * ports(rng.standard_normal((2, N)), amp(read(PUMP_COLOUR)), (600, 14000))
    return on * (priming * (whine + rush) + hum_gain * hum)


# Tone colour of the rumble outdoors. Each row: frequency in Hz, relative level in dB per Hz.
OUTDOOR_COLOUR = [(25, -24.5), (50, -4), (75, 4), (130, -5.5), (300, -19), (500, -26.5), (1000, -24),
                  (3000, -29), (6000, -45), (14000, -56)]


def outdoors(air_db=-51.0, hum_db=-52.5, rustle_db=-53.0, rustle_hz=290):
    """Low neighbourhood rumble of noise, a wavering distant hum, and a soft rustle at first."""
    hum_angle = 2 * np.pi * np.cumsum(75 + 5 * drift(15)) / SR
    hum = amp(hum_db) * evened((1 + .6 * drift(12)) * np.sin(hum_angle))
    rustle = ports(rng.standard_normal((2, N)), peaks([(rustle_hz, 130, 0)]), (25, 14000))
    rustle = rustle * np.exp(-((TIME - .06) / 0.067) ** 2)
    air = ports(rng.standard_normal((2, N)), amp(read(OUTDOOR_COLOUR)), (25, 14000))
    return hum + amp(rustle_db) * rustle + amp(air_db) * air


# How alike left and right are. Each row: frequency in Hz, likeness from 0 to 1.
SIDE_LIKENESS = [(350, .99), (800, .8), (1130, .3), (1450, .8), (1800, .4), (2650, .82), (3700, .45),
                 (4400, .6), (5800, .25), (8000, .25), (9100, .85), (10600, .7), (11300, .99), (15000, .97)]
# How far the left leads the right. Each row: frequency in Hz, lead in radians.
LEFT_LEAD = [(0, 0), (550, 0), (1000, -2.5), (1200, -.8), (1650, -2.5), (1900, -1), (2500, -2.9),
             (4100, -6.2), (5000, -6.5), (8000, -12), (9100, -9.5), (10100, -9.4), (11200, -6.3),
             (12800, -6.2), (13800, -3.2)]
# How much louder the left is. Each row: frequency in Hz, left minus right in dB.
LEFT_EXCESS = [(60, -1), (640, -1), (1400, -3.5), (2400, .5), (15000, 0)]


def ports(drive, colour, band):
    """Colours two unrelated drives into a partly alike stereo pair; its middle has rms 1 inside band."""
    a, b = rfft(drive)
    same = np.clip(read(SIDE_LIKENESS), 0, 1)
    turn, side = np.exp(-1j * read(LEFT_LEAD)), amp(read(LEFT_EXCESS) / 2)
    right = (same * a + np.sqrt(1 - same ** 2) * b) * turn / side
    pair = colour * np.array([a * side, right])
    inside = (BINS > band[0]) & (BINS < band[1])
    return irfft(pair, N) / np.std(irfft(pair.mean(0) * inside, N))


def grains(per_s, spread_db):
    """Two trains of tiny random impacts, a few of them large."""
    size = amp(spread_db * np.minimum(rng.exponential(1, (2, N)), 4))
    return evened(size * rng.standard_normal((2, N)) * (rng.random((2, N)) < per_s / SR))


def peaks(modes):
    """Gain over frequency of a set of resonances."""
    return sum(amp(db) / (1 + ((BINS - hz) / width) ** 2) for hz, width, db in modes)


def drift(hz):
    """Slow random wander of rms 1, up to about hz."""
    step = 32  # drawn coarsely, then joined by lines
    noise = rng.standard_normal(N // step + 2)
    lowpass = 1 / (1 + (np.fft.rfftfreq(len(noise), step / SR) / hz) ** 4)
    slow = irfft(rfft(noise) * lowpass, len(noise))
    return evened(np.interp(np.arange(N), np.arange(len(noise)) * step, slow))


def curves(rows):
    """Each column of a table, joined by lines in time."""
    s, *columns = np.transpose(rows)
    return [np.interp(TIME, s, c) for c in columns]


def read(points):
    """A table joined by lines over log frequency."""
    hz, value = np.transpose(points)
    return np.interp(np.log(BINS + 1), np.log(hz + 1), value)


def amp(db):
    """Decibels to gain."""
    return 10 ** (np.asarray(db) / 20)


def evened(x):
    """Scales to rms 1."""
    return x / np.sqrt(np.mean(x ** 2) + 1e-20)


def scene():
    """Pump, starter, then the running engine, which stumbles once just after it catches."""
    firings = crank()
    blows = blow_timing(firings)
    caught = np.interp(TIME, [1.48, 1.508, 1.53, 1.55, 1.566, 1.582], [0, .05, 1, 1, .5, 1])
    pipe = caught * (exhaust(firings) + chuffs(*blows) + puffs(*blows)) + cracks()
    running = pipe + engine_bay(firings) + belt_whine()
    return running + starter() + thuds() + fuel_pump() + outdoors()


EDGE_HZ = 15800  # top of the band


def record(dry):
    """Rounds off the loudest peaks, fades the very ends, then removes what lies above the band."""
    rounded = dry / (1 + (dry / .96) ** 8) ** (1 / 8)
    faded = rounded * signal.windows.tukey(N, .001)
    lowpass = signal.firwin(511, EDGE_HZ, window=("kaiser", 9), fs=SR)
    return signal.oaconvolve(faded, lowpass[None], "same")


dry = scene()
out = record(dry)
transcribe(out)
```